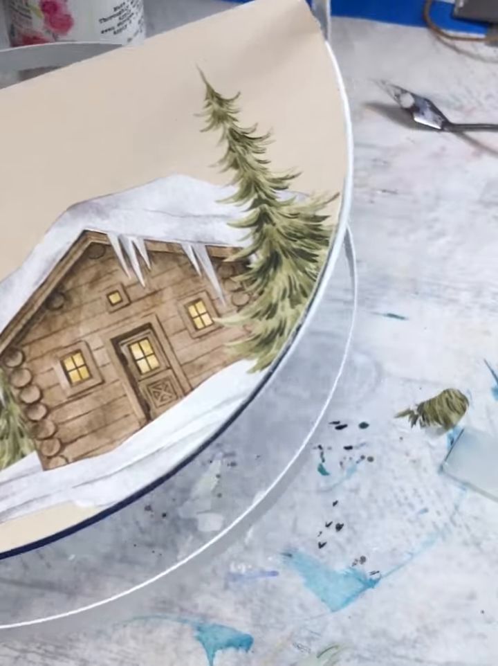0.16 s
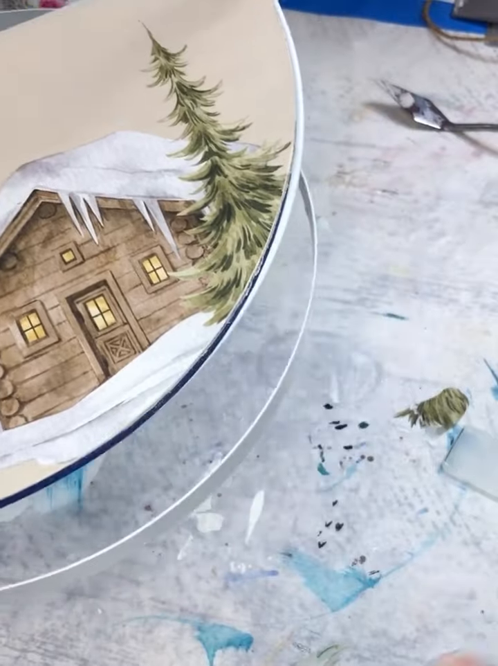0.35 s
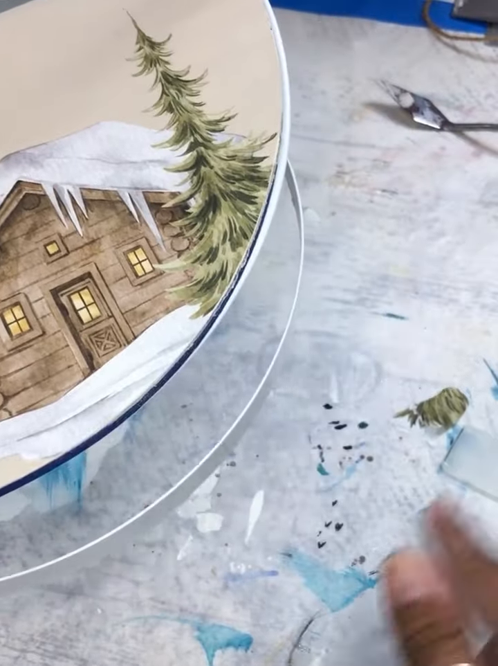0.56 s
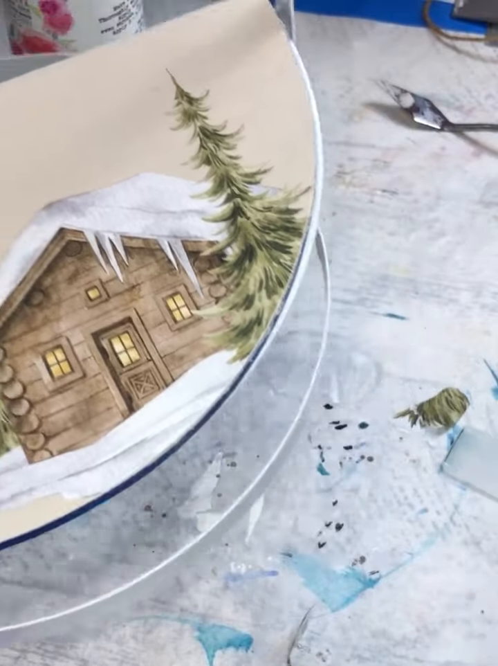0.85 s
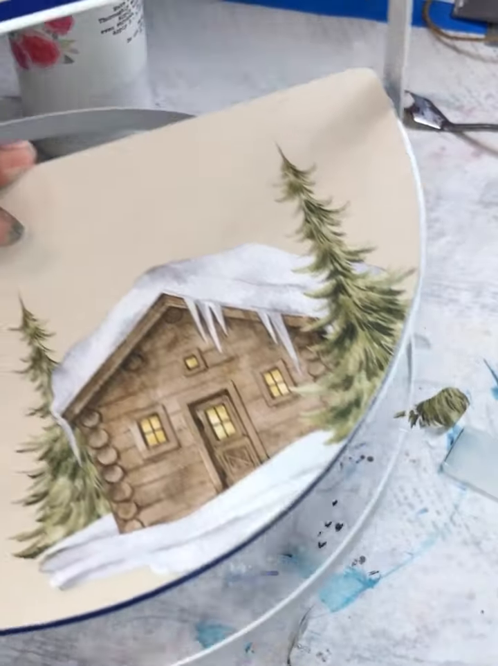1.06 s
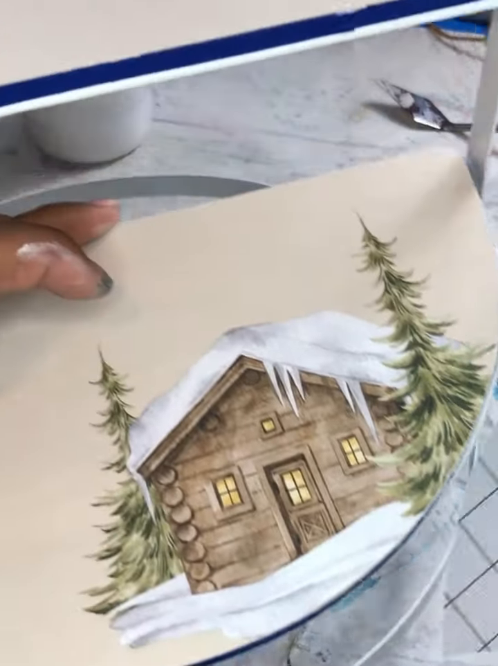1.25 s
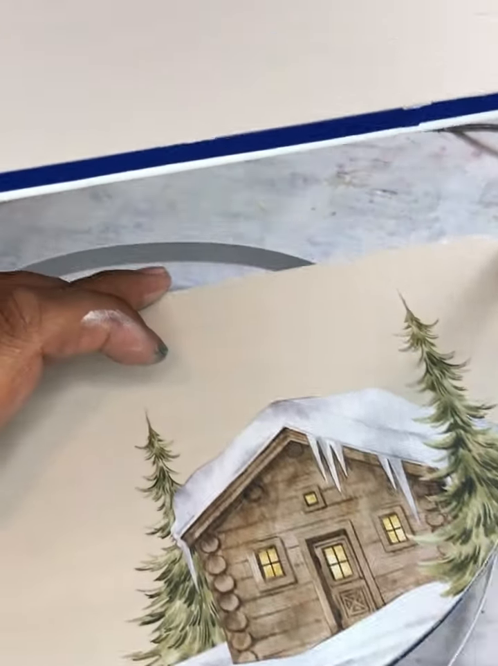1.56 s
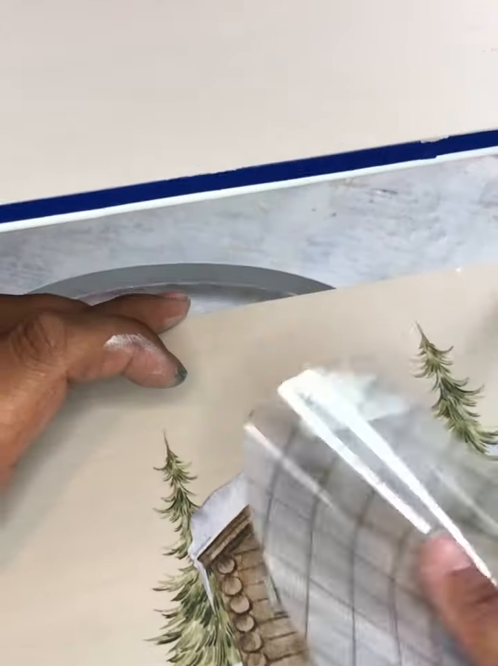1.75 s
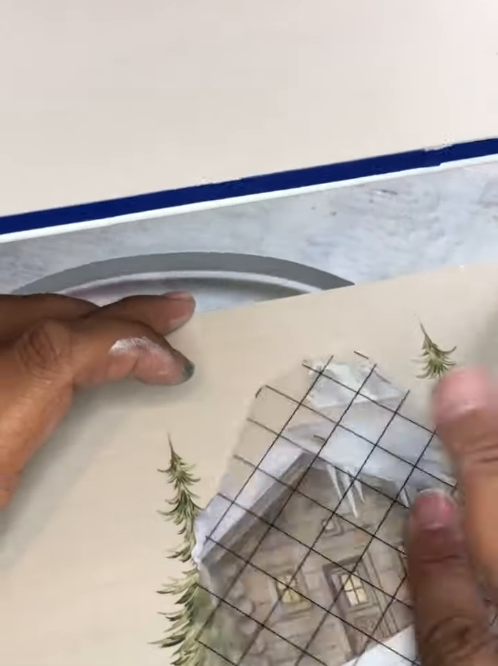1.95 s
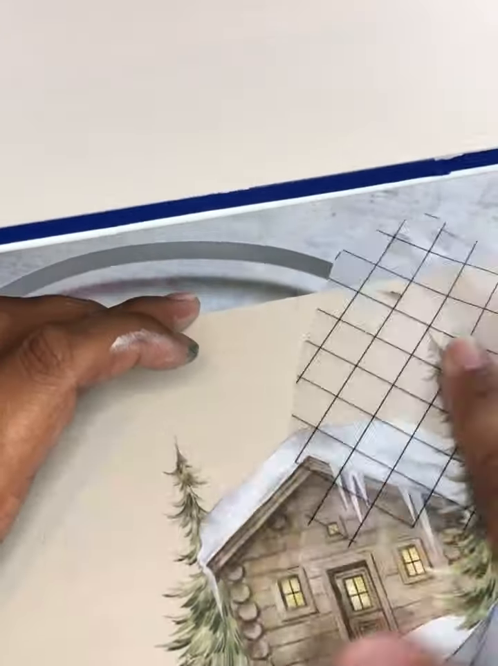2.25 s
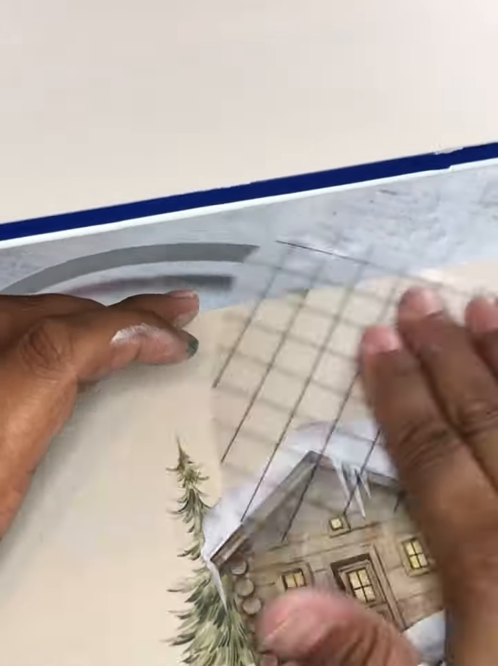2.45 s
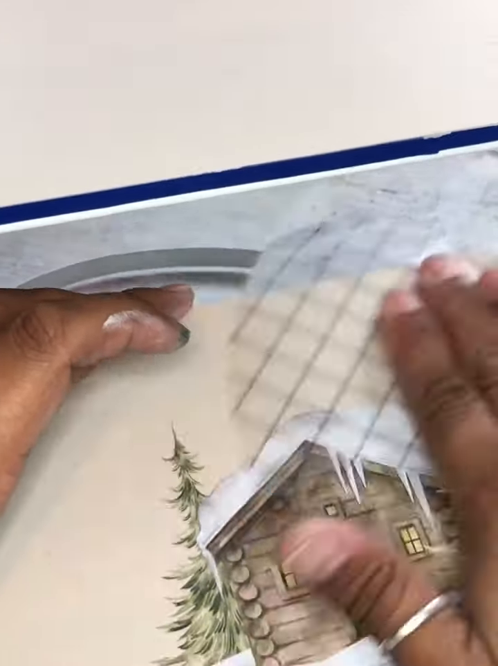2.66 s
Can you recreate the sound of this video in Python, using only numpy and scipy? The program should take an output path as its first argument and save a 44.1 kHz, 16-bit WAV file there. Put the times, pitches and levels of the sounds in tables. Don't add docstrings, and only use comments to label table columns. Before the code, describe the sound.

A thin plastic sheet rustles with a few sharp snaps as it is shifted and laid on a board, then fingers rub it in quick hissing, crackling strokes; close microphone in a small, faintly humming room.

```python
import sys
import numpy as np
from scipy import signal
from scipy.fft import rfft, irfft
from scipy.io import wavfile
from scipy.ndimage import uniform_filter1d

SR = 44100
rng = np.random.default_rng(int(sys.argv[2]) if len(sys.argv) > 2 else 0)


def amplitude_ratio(level_db):
    exponent = np.asarray(level_db, float) / 20
    return 10 ** exponent


def store_wav(level_fs):
    pcm = np.round(np.clip(np.atleast_2d(level_fs), -1, 1) * 32767)
    wavfile.write(sys.argv[1], SR, pcm.T.astype(np.int16))


N = 123479


def unit(x):
    return x / np.sqrt(np.mean(x ** 2))


def colour(x, points):
    hz, db = np.array(points, float).T
    bins_hz = np.arange(1, len(x) // 2 + 2) * SR / len(x)
    gain = amplitude_ratio(np.interp(np.log(bins_hz), np.log(hz), db))
    return irfft(rfft(x) * gain, len(x))


def band(x, hz, width_hz):
    b, a = signal.iirpeak(min(hz, 0.45 * SR), hz / width_hz, fs=SR)
    return signal.lfilter(b, a, x)


def walk(rate_hz):
    hold = int(SR / rate_hz)
    steps = np.repeat(rng.standard_normal(N // hold + 1), hold)
    slewed = uniform_filter1d(uniform_filter1d(steps, hold), hold)
    return 1.59 * slewed[:N]


def add(out, time_s, x):
    i = int(time_s * SR)
    out[i:i + len(x)] += x[:N - i]


# (frequency [Hz], density [dB per Hz])
AIR_SPECTRUM = [(30, -16), (110, -10), (230, 0), (600, -19), (2050, -27), (5000, -38), (15500, -46)]
# (frequency [Hz], width [Hz], level [dB])
HUM_TONES = [
    (59, 6.3, -66.5),
    (223, 7.5, -66),
    (236, 7.94, -66),
    (299.3, 9.3, -66),
    (328.5, 10.5, -68),
]


def room_tone():
    air_db = -57.5 - 1.5 + 0.76 * walk(6.43)
    out = unit(colour(rng.standard_normal(N), AIR_SPECTRUM)) * amplitude_ratio(air_db)
    for hz, width_hz, db in HUM_TONES:
        phase = np.cumsum(2 * np.pi * (hz + width_hz / 3 * walk(24.91)) / SR)
        tone = np.sin(phase) * amplitude_ratio(1.1 * walk(21.7))
        out += amplitude_ratio(db) * unit(tone)
    return out


def echo(dry):
    t60_s, rise_s, echo_db = 0.24, 0.0039, -25
    t = np.arange(SR // 3) / SR
    tail = rng.standard_normal(len(t)) * amplitude_ratio(-60 * t / t60_s) * np.minimum(t / rise_s, 1)
    tail = colour(tail, [(300, -19.0), (2000, 9.5), (6000, 6.5), (15000, -36.0)])
    tail /= np.sqrt(np.sum(tail ** 2))
    return amplitude_ratio(echo_db) * signal.fftconvolve(dry, tail)[:N]


# (time [s], peak [dB], pitch [Hz], length [ms])
PRESSES = [(0.18, -31.5, 950, 17), (0.282, -36, 1150, 86), (0.48, -42, 322, 20), (0.7, -33.5, 1200, 81),
           (0.769, -31, 1240, 16), (0.921, -32.5, 1030, 21), (1.723, -29, 368, 15.4), (1.842, -19, 900, 10),
           (1.913, -22, 524, 16), (1.925, -25.5, 805, 25), (1.999, -29.5, 836, 25), (2.064, -30, 750, 56),
           (2.154, -28.5, 474, 13.6), (2.322, -30, 820, 18), (2.438, -29, 580, 8.3), (2.517, -25, 840, 5.1),
           (2.524, -23.5, 533, 6.4), (2.659, -17.5, 940, 46), (2.714, -19, 765, 14), (2.743, -18.5, 900, 6)]
# (time [s], peak [dB], pitch [Hz])
BUMPS = [(0.18, -41, 202), (0.477, -43, 184), (0.491, -46.5, 65), (1.537, -41.5, 153), (1.724, -32.5, 134),
         (1.801, -41.5, 86.1), (1.916, -31, 192), (2.061, -33, 184), (2.127, -35, 147), (2.324, -46, 128),
         (2.44, -45, 120), (2.524, -37.5, 178), (2.649, -41, 110), (2.738, -38, 190)]


def board_thuds():
    bump_ms, rise_ms, press_q = 39.3, 1, 1.1
    out, t_ms = np.zeros(N), np.arange(6000) / SR * 1000
    for time_s, db, hz, length_ms in PRESSES + [(*bump, bump_ms) for bump in BUMPS]:
        envelope = (1 - np.exp(-t_ms / rise_ms)) * np.exp(-(t_ms / length_ms) ** 1.07)
        push = rng.standard_normal(len(t_ms)) * envelope
        thud = band(band(push, hz, hz / press_q), hz, 2 * hz)
        add(out, time_s, thud * amplitude_ratio(db) / np.abs(thud).max())
    return out


# (start [s], end [s])
SINGING_TIMES = [(.19, .28), (.6, .69), (1.095, 1.13), (1.575, 1.655), (1.92, 2.29), (2.56, 2.62)]
# (frequency [Hz], width [Hz], level [dB])
SINGING_VOICES = [
    (3320, 460, -45.5),
    (1930, 220, -55),
    (1580, 100, -49.5),
    (8200, 1300, -63),
    (93.1, 1.6, -51.5),
    (2500, 500, -47),
]


def singing():
    out, t = np.zeros(N), np.arange(N) / SR
    for (start, end), (hz, width_hz, db) in zip(SINGING_TIMES, SINGING_VOICES):
        corners = [start, 0.8 * start + 0.2 * end, 0.2 * start + 0.8 * end, end]
        swell = np.interp(t, corners, [0, 1, 1, 0])
        voice = band(band(rng.standard_normal(N), hz, width_hz), hz, 2 * width_hz) * swell
        out += amplitude_ratio(db) * voice / np.sqrt(np.sum(voice ** 2) / np.sum(swell ** 2))
    return out


def grains(per_s, spread_db):
    size_db = spread_db * np.minimum(rng.exponential(size=N), 4)
    size = amplitude_ratio(size_db) * rng.standard_normal(N)
    return size * (rng.random(N) < per_s / SR)


def patchy(x, points, patch_db, rate_hz):
    x = colour(x, points)
    out = np.zeros(N)
    for hz in 300 * 2 ** (np.arange(17) / 3):
        out += band(x, hz, hz / 4) * amplitude_ratio(patch_db * walk(rate_hz))
    return unit(out)


def motion(times, levels, shape):
    edge_db = -14
    t, power = np.arange(N) / SR, np.zeros((2, N))
    for (start, top, end), skin_film_db in zip(times, levels):
        away = np.where(t < top, (top - t) / abs(top - start), (t - top) / abs(end - top))
        swell_db = edge_db * np.minimum(away, 4) ** shape
        power += amplitude_ratio(swell_db + np.array(skin_film_db)[:, None]) ** 2
    return power


# (start [s], strongest [s], end [s])
SHIFT_TIMES = [(-.03, .02, .055), (.066, .1, .2), (.17, .23, .3), (.272, .288, .3), (.31, .326, .345),
               (.358, .372, .425), (.478, .51, .545), (.55, .62, .69), (.655, .68, .7), (.693, .71, .765),
               (.76, .77, .798), (.815, .84, .86), (.855, .88, .925), (.918, .928, .965),
               (1.02, 1.1, 1.165), (1.16, 1.2, 1.24), (1.284, 1.33, 1.385), (1.37, 1.43, 1.55),
               (1.54, 1.558, 1.58), (1.57, 1.62, 1.705), (-.4, .3, .95)]
# (skin hiss [dB], film rustle [dB])
SHIFT_LEVELS = [(-49, -44), (-46.5, -46), (-40, -45.5), (-45, -35.5), (-41.5, -46.5), (-57.5, -44.5),
                (-54.5, -51), (-56, -50.5), (-48.5, -47.5), (-52.5, -43), (-64, -54), (-57, -52),
                (-49.5, -46), (-57, -45.5), (-52, -48), (-76, -60.5), (-64, -52.5), (-60.5, -55),
                (-62.5, -43), (-50, -48), (-70, -61)]
# (start [s], strongest [s], end [s])
STROKE_TIMES = [(1.74, 1.80, 1.87), (1.855, 1.885, 1.96), (1.982, 2.05, 2.085), (2.095, 2.105, 2.115),
                (2.125, 2.21, 2.258), (2.27, 2.325, 2.378), (2.402, 2.44, 2.476), (2.502, 2.545, 2.574),
                (2.603, 2.66, 2.69), (2.675, 2.758, 2.793)]
# (skin hiss [dB], film rustle [dB])
STROKE_LEVELS = [(-36.5, -37.5), (-41.5, -46), (-40, -51), (-43, -33), (-36.5, -52), (-32.5, -39),
                 (-27, -40.5), (-27.5, -52), (-25.5, -38.5), (-27.5, -33.5)]
# (frequency [Hz], density [dB per Hz])
SKIN_SPECTRUM = [(1500, -63), (3000, -2), (5800, -0.5), (9000, 3), (15000, -1)]
# (frequency [Hz], density [dB per Hz])
FILM_SPECTRUM = [(350, -3), (700, -2), (1500, 0), (2100, 3), (3000, -2), (5000, -7.5), (10000, -36)]


def sliding():
    shifts = motion(SHIFT_TIMES, SHIFT_LEVELS, shape=2.4)
    times = list(STROKE_TIMES) + [(1.75, 2.55, 3.3)]
    levels = list(STROKE_LEVELS) + [(-46, -50)]
    skin, film = np.sqrt(shifts + motion(times, levels, shape=4.5))
    hiss = patchy(grains(per_s=14000, spread_db=1.9), SKIN_SPECTRUM, patch_db=3, rate_hz=14)
    rustle = patchy(grains(per_s=9000, spread_db=1.8), FILM_SPECTRUM, patch_db=2.8, rate_hz=30)
    return skin * hiss * amplitude_ratio(1.3 * walk(110)) + film * rustle * amplitude_ratio(2.2 * walk(140))


def snap(hz, length_ms, rise_ms, crack_top_hz, ring_db, flip):
    spread_db, settle_db, settle_ms, flip_db = 4.5, -23.5, 24, 22.5
    ring_q, ring_ms, crack_reach = 4.8, 5.7, 3
    t_ms = np.arange(2048) / SR * 1000
    rise = np.minimum(t_ms / rise_ms, 1)
    fade = rise ** 2 * np.exp(-(np.maximum(t_ms - rise_ms, 0) / length_ms) ** 1.35)
    fade += amplitude_ratio(settle_db) * rise * np.exp(-t_ms / settle_ms)
    size_db = spread_db * np.minimum(rng.exponential(size=len(t_ms)), 3)
    burst = rng.standard_normal(len(t_ms)) * amplitude_ratio(size_db) * fade
    if flip:
        burst[0] += amplitude_ratio(flip_db)
    ring = band(burst, hz, hz / ring_q) + 0.71 * band(burst, 1.06 * hz, 300 / ring_ms)
    edges_hz = [hz / crack_reach, min(crack_top_hz, 0.45 * SR)]
    crack = signal.sosfilt(signal.butter(3, edges_hz, "band", fs=SR, output="sos"), burst)
    return unit(ring) * amplitude_ratio(ring_db) + unit(crack)


# (time [s], peak [dB], ring [Hz], length [ms])
CREASES = [(0.083, -39, 1400, 11), (0.178, -18.5, 3040, 5.6), (.2794, -13, 8100, 2.1),
           (0.2786, -15, 4660, 2.7), (0.287, -23, 2370, 6.5), (.355, -19, 7060, 4),
           (0.3634, -15.5, 2170, 3.4), (0.5804, -35, 1730, 4.1), (.585, -39.5, 1000, 3.9),
           (.602, -29, 3600, 3), (.676, -39, 7000, 5.4), (0.6968, -30, 2300, 3.4), (.728, -37, 1670, 5.7),
           (0.7663, -34, 1520, 8.3), (1.3388, -33.5, 2100, 3.5), (1.3834, -35, 1520, 3.2),
           (1.5564, -46, 1930, 1.9), (1.685, -32, 2600, 2.8)]
# (time [s], peak [dB], ring [Hz], length [ms])
CRACKS = [(1.7361, -25, 2120, 3.5), (1.7621, -10, 3500, 1.3), (1.7642, -28.5, 1710, 11),
          (1.774, -26, 4970, 2.2), (1.8153, -17, 5300, 5.9), (1.835, -19.5, 4100, 5.3),
          (1.839, -16, 1325, 6.3), (1.9062, -23.5, 2280, 8), (1.928, -26.5, 2540, 5.3),
          (2.068, -26, 2100, 7.3), (2.1027, -16, 5200, 4.6), (2.1527, -27, 6000, 6),
          (2.221, -25, 4300, 5.6), (2.275, -25, 5400, 8.9), (2.291, -22.5, 5060, 4.3),
          (2.321, -19, 6000, 7.2), (2.329, -22, 2850, 1.5), (2.341, -24, 3120, 6.1),
          (2.357, -21, 4700, 7.4), (2.4, -22, 5700, 2.3), (2.413, -18.5, 5660, 16), (2.43, -19, 2860, 2),
          (2.4378, 1, 5170, 3.1), (2.4418, -7, 4900, 1.4), (2.5244, -13, 4070, 3.9),
          (2.528, -12.5, 8200, 3.6), (2.54, -11.5, 3000, 6.1), (2.5564, -22, 1830, 4.5),
          (2.564, -21.5, 1840, 3), (2.6166, -11.5, 2420, 4.8), (2.6399, 0.5, 5740, 1.46),
          (2.644, -13, 3900, 2.2), (2.658, -13, 4000, 13), (2.6709, -0.5, 3300, 1), (2.6738, -4, 2830, 2.5),
          (2.678, -11.5, 7600, 3.7), (2.718, -17, 4220, 5.4), (2.7427, -8.5, 4180, 5.2),
          (2.757, -12.5, 2830, 3.5), (2.759, -6, 8950, 4.2), (2.779, -16.5, 2350, 6.9)]
# (time [s], peak [dB], ring [Hz], length [ms])
POPS = [
    (0.9221, -21.5, 1650, 2),
    (1.0944, -25, 1470, 4.2),
    (1.6461, -23.5, 2220, 3.5),
    (1.7993, -11, 3170, 1.2),
    (2.5396, 3, 2620, 0.4),
    (2.5489, -3, 2430, 1.7),
    (2.7673, -1, 2500, 2.2),
]
# (time [s], peak [dB], length [ms])
TICKS = [(0.1853, -18, 5.7), (0.2929, -19, 4.3), (0.4364, -36.5, 6.7), (0.4804, -56, 3.6), (1.1994, -53, 3),
         (1.216, -55, 2), (1.227, -48.5, 3.4), (1.2486, -50, 3), (1.3269, -54, 3.3), (1.3392, -40, 1.2),
         (1.385, -37, 3.9), (1.3932, -36.5, 3), (1.4083, -50, 2.8), (1.4228, -32, 2), (1.538, -41, 3.3),
         (1.715, -53, 1.64), (1.7618, -11, 2.9), (2.206, -39, 1.9), (2.606, -24, 8.7)]


def snaps():
    crack_span, ring_db, tick_hz, tick_ring_db = 3.01, 8.5, 2020, -8.5
    rows = [(*row, crack_span * row[2], ring_db, False) for row in CREASES + CRACKS]
    rows += [(*row, crack_span * row[2], ring_db, True) for row in POPS]
    rows += [(time_s, db, tick_hz, ms, SR, tick_ring_db, False) for time_s, db, ms in TICKS]
    out = np.zeros(N)
    for time_s, db, hz, length_ms, crack_top_hz, ring, flip in rows:
        rise_ms = max(0.187 * length_ms, 1.19 if hz > 3500 else 1)
        if flip:
            rise_ms = 0.19
        x = snap(hz, length_ms, rise_ms, crack_top_hz, ring, flip)
        add(out, time_s, x * amplitude_ratio(db) / np.abs(x).max())
    return out


def scene():
    dry = board_thuds() + singing() + sliding() + snaps()
    return (dry + echo(dry) + room_tone())[None]


def top_cut(x):
    return signal.sosfilt(signal.butter(12, 16990, fs=SR, output="sos"), x)


def record(dry):
    low_hz, top_hz = 50, 15750
    x = 0.8 * np.tanh(dry / 0.8)
    x = signal.sosfilt(signal.butter(4, low_hz, "high", fs=SR, output="sos"), x)
    x = signal.sosfilt(signal.ellip(8, 0.2, 35, top_hz, fs=SR, output="sos"), x)
    return top_cut(x)


dry = scene()
out = record(dry)
store_wav(out)
```